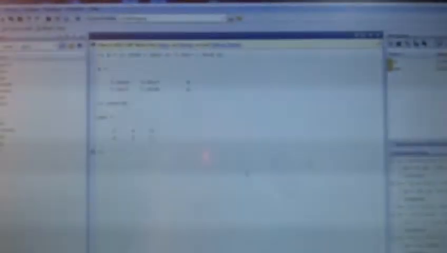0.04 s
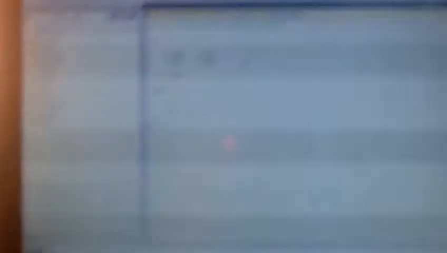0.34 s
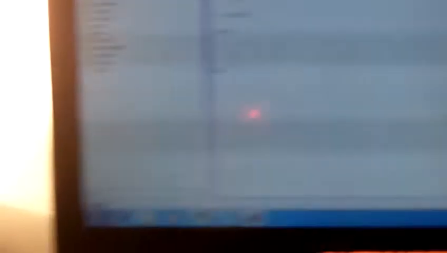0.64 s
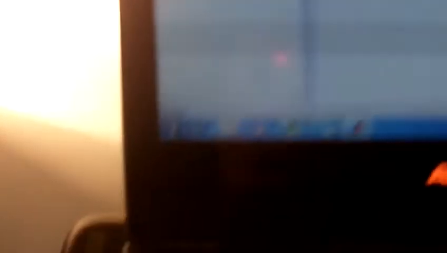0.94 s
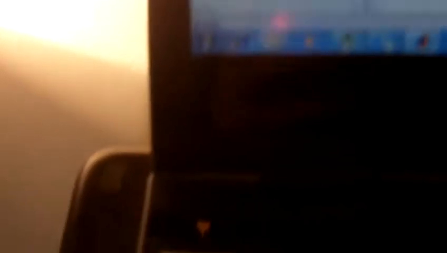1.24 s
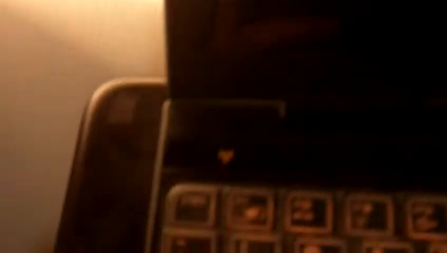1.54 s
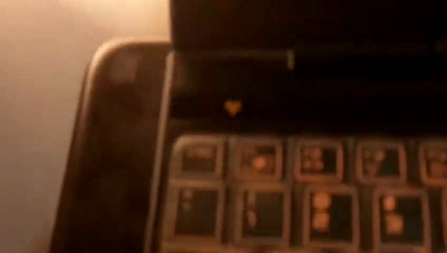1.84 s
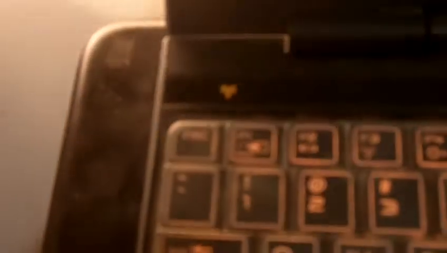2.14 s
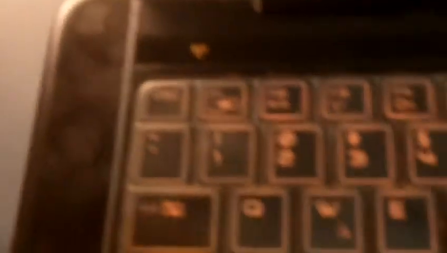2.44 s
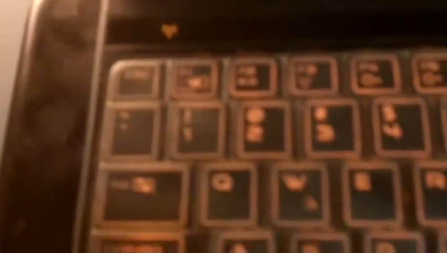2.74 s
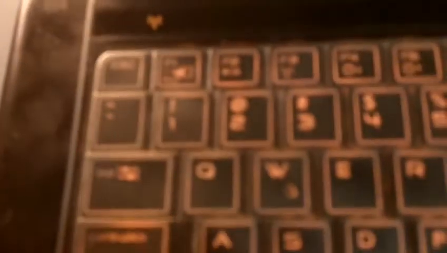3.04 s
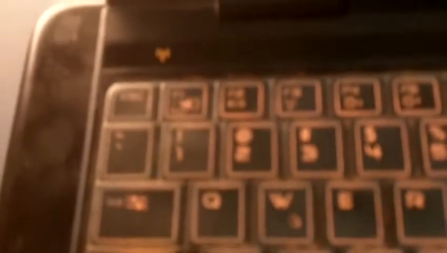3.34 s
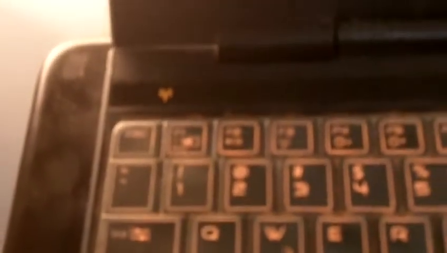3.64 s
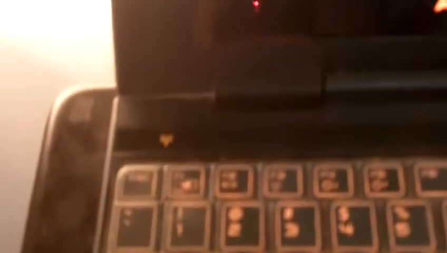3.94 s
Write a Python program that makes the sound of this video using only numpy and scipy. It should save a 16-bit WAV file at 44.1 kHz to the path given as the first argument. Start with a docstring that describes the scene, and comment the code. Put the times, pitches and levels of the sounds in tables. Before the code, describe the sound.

A laptop fan runs without a break, buzzing and blowing air in a quiet room. As the microphone drifts down to the keyboard, a low hum and soft vent hiss come forward, along with faint plastic ticks and swishes.

```python
"""Laptop fan in a quiet room

A cooling fan runs steadily while the microphone moves from the screen down to the keyboard.
The motor's chopped drive pulses, scaled by the turning magnets, ring the case: a buzz of close,
beating lines. Air rushes through the vent, soft swishes and ticks come and go, over a low rumble."""
import sys
import numpy as np
from scipy import signal
from scipy.fft import rfft, irfft
from scipy.io import wavfile
from scipy.ndimage import uniform_filter1d

SR = 44100
rng = np.random.default_rng(int(sys.argv[2]) if len(sys.argv) > 2 else 0)


def file_out(sig):
    """Save sig as 16-bit WAV at sys.argv[1]."""
    # one column per channel
    cols = np.atleast_2d(sig).T
    # limit, then scale
    lim = np.clip(cols, -1, 1)
    pcm = np.round(lim * 32767).astype(np.int16)
    wavfile.write(sys.argv[1], SR, pcm)


N = 176400
T = np.arange(N) / SR


def amp(db):
    return 10 ** (np.asarray(db) / 20)


def unit(x):
    return x / np.sqrt(np.mean(x ** 2) + 1e-30)


def curve(points):
    return np.interp(T, *np.transpose(points))


def gains(points, size):
    """Gain of a (Hz, dB) table at the bins of an FFT."""
    hz, db = np.transpose(points)
    return amp(np.interp(np.log(np.fft.rfftfreq(size, 1 / SR) + 1), np.log(hz + 1), db))


def colour(x, points):
    return irfft(rfft(x) * gains(points, N), N)


def ring(x, points, size=8192):
    """Minimum-phase filter: the table's peaks ring on after each pulse."""
    log_gain = np.log(gains(points, size))
    mirrored = np.concatenate([log_gain, log_gain[-2:0:-1]])
    response = np.fft.ifft(np.exp(np.conj(signal.hilbert(mirrored)))).real
    return signal.oaconvolve(x, response[:size // 2])[:N]


def noise(points, correlation=1):
    """Coloured stereo noise at unit RMS."""
    mid, side = rng.standard_normal((2, N))
    side *= np.sqrt((1 - correlation) / (1 + correlation))
    return unit(colour(np.array([mid + side, mid - side]), points))


# Each row: time in seconds, magnet cycle rate in Hz.
MAGNET_RATE_HZ = [(0, 128.45), (2, 127.91), (4, 127.15)]


def magnet_angle():
    """Phase of the magnet cycle in radians; the motor's speed sags slowly."""
    return 2 * np.pi * np.cumsum(curve(MAGNET_RATE_HZ)) / SR


def drive_pulses(chop_hz=189.18, echo_s=0.000689, echo_gain=0.37):
    """Chopped motor drive; each pulse returns once inside the case."""
    jitter_s = 2e-6 * unit(uniform_filter1d(rng.standard_normal(N), size=400))
    phasor = np.exp(2j * np.pi * chop_hz * (T + jitter_s))
    harmonics = 1 + echo_gain * np.exp(-2j * np.pi * chop_hz * echo_s * np.arange(25))
    return np.polyval(harmonics[::-1], phasor).real


# Magnet pull over one cycle. Each entry: relative level in dB of harmonic 0, 1, 2, 3.
PULL_HARMONICS_DB = [3.5, 20.5, -18.5, 5]
# Case response at the keyboard. Each row: frequency in Hz, relative gain in dB.
CASE_RESPONSE = [(100, -37), (300, -23.5), (440, 4.5), (520, -27.5), (700, -17.5), (818, 0.5), (900, -29.5),
                 (1080, -17), (1196, 0.5), (1265, 0.5), (1385, 2), (1452, 6), (1520, 2), (1641, 2),
                 (1770, -30), (2020, -42), (2210, -9.5), (2400, -14), (2520, -1.5), (2600, -3.5),
                 (2776, -3.5), (2850, -25.5), (2966, 2), (3090, -47.5), (3344, 1.5), (3466, -40),
                 (3533, -2), (3722, -11.5), (3900, -7.5), (4034, -3.5), (4130, -32.5), (4223, -2),
                 (4450, -29), (5000, 2), (5500, -37.5)]


def buzz(pulses, angle, level_db=-51, skew_rad=0.39):
    """Drive pulses, each as strong as the magnets' lopsided pull at that moment, ring the case."""
    swing = sum(amp(db) * np.cos(m * angle + skew_rad * m * m)
                for m, db in enumerate(PULL_HARMONICS_DB) if m)
    pull = amp(PULL_HARMONICS_DB[0]) / 2 + swing
    return amp(level_db) * unit(ring(pulses * pull, CASE_RESPONSE))


def scatter(x, decay_s=0.003, size=2048):
    """Dense reflections inside the case smear each pulse without changing its colour."""
    tail = rfft(rng.standard_normal(size) * np.exp(-np.arange(size) / (decay_s * SR)))
    allpass = irfft(tail / abs(tail))[:size // 2]
    return signal.oaconvolve(x, allpass)[:N]


# Colour of the fine buzz. Each row: frequency in Hz, relative gain in dB.
CHATTER_RESPONSE = [(300, -22), (640, -8.5), (950, -12.5), (1150, -10.5), (1350, -4), (1520, 10.5),
                    (1700, -8.5), (1900, -15), (2200, -7), (2450, 1), (2650, -3), (2900, 4), (3150, 0.5),
                    (3330, 4.5), (3650, 2), (3850, -2), (4050, 5), (4280, 2.5), (4550, -13.5),
                    (4800, -16.5), (5200, -31)]


def chatter(pulses, angle, level_db=-53.5):
    """The sharp corners of the pull add a dense comb of weaker lines."""
    corners = sum(scatter(pulses * np.cos(m * angle)) / m for m in range(4, 10))
    return amp(level_db) * unit(ring(corners, CHATTER_RESPONSE))


# Each row: frequency in Hz, relative density in dB.
AIR_SPECTRUM = [(150, 3.5), (300, 0.5), (550, -8), (800, 1), (1100, -1), (1400, 2), (1650, 4), (1900, -3),
                (2200, -11), (2500, -10.5), (2900, 7), (3400, -3.5), (3800, -7.5), (4200, -7), (4600, -7),
                (5000, -32), (6000, -27.5), (9000, -29)]


def air_rush(level_db=-57):
    """Steady rush of air, as heard at the keyboard."""
    return amp(level_db) * noise(AIR_SPECTRUM)


# Each row: time in seconds, position (0 screen, 1 keyboard, above 1 extrapolated).
MIC_PATH = [(0, 0), (.45, .05), (.9, 0.56), (1.35, 1.15), (2.2, 1.27), (4, 1.04)]
# Change of colour at the screen. Each row: frequency in Hz, gain in dB.
SCREEN_RESPONSE = [(450, -1), (1200, -0.5), (1420, -6), (1650, 4), (2000, -4), (2550, 0), (2900, -7),
                   (3250, -8.5), (3550, -4), (3950, -3), (4300, -2.5)]


def moving_microphone(fan):
    """The fan's colour shifts as the microphone moves from screen to keyboard."""
    position = curve(MIC_PATH)
    return position * fan + (1 - position) * colour(fan, SCREEN_RESPONSE)


# Each row: time in seconds, RMS level of the fundamental in dB.
HUM_LEVEL_DB = [(0, -75), (1, -59.5), (2.2, -57), (4, -58.5)]


def motor_hum(angle, third_db=-71):
    """The magnets' own hum and its third harmonic."""
    fundamental = amp(curve(HUM_LEVEL_DB)) * np.sin(angle)
    return np.sqrt(2) * (fundamental + amp(third_db) * np.cos(3 * angle))


# Each row: frequency in Hz, relative density in dB.
VENT_SPECTRUM = [(3000, -74), (4700, 9), (5500, -14), (6100, 4), (6600, 6.5), (7300, 7), (7700, -4),
                 (9000, -18), (14000, -26)]
# Each row: time in seconds, level in dB.
VENT_LEVEL_DB = [(0, -77.5), (.7, -70.5), (1.0, -66), (1.25, -66.5), (1.5, -65), (1.75, -69), (2.05, -67.5),
                 (2.25, -71.5), (2.9, -71.5), (3.4, -72.5), (4, -73)]


def vent_hiss(angle, depth=0.43):
    """Air in the vent hisses, pulsing twice per magnet cycle."""
    pulsing = unit(1 + depth * np.cos(2 * angle))
    return amp(curve(VENT_LEVEL_DB)) * pulsing * noise(VENT_SPECTRUM)


# Each row: centre in seconds, length in seconds, level in dB.
TREBLE_SWISHES = [(.44, 0.12, -77), (1.02, 0.4, -80), (1.505, 0.17, -74), (2.013, .25, -76.5),
                  (2.51, 0.24, -78), (2.918, 0.3, -74.5), (3.79, 0.11, -74.5)]
# Each row: frequency in Hz, relative density in dB.
SWISH_SPECTRUM = [(4000, -33), (6500, -8), (8200, 13), (9500, 7), (12000, 2.5), (15000, -25)]


def swishes(floor_db=-81.5):
    """Soft, bright swishes swell out of a thin, steady treble noise."""
    swell_power = sum(amp(db) ** 2 * np.exp(-(2 * (T - centre_s) / length_s) ** 2)
                      for centre_s, length_s, db in TREBLE_SWISHES)
    return np.sqrt(amp(floor_db) ** 2 + swell_power) * noise(SWISH_SPECTRUM, correlation=0.83)


# Each row: start in seconds, relative level in dB.
PLASTIC_TICKS = [(.448, -48.5), (.961, -41), (1.057, -46), (1.425, -52), (1.970, -53)]
# Each row: frequency in Hz, relative density in dB.
TICK_SPECTRUM = [(1500, -44), (4500, -9), (6500, 9.5), (8500, -5.5), (11000, -17), (15000, -43)]


def ticks(decay_s=0.0035, rattle_per_s=50):
    """A few clear ticks of plastic and a faint random rattle, each a short burst of noise."""
    rattling = rng.random(N) < rattle_per_s / SR
    rattle_db = -63 + 1.5 * np.clip(rng.standard_normal(N), -2, 2)
    hits = rattling * amp(rattle_db)
    for start_s, db in PLASTIC_TICKS:
        hits[round(start_s * SR)] += amp(db)
    envelope = signal.lfilter([1], [1, -np.exp(-1 / (decay_s * SR))], hits)
    return envelope * noise(TICK_SPECTRUM) / 2


# Each row: frequency in Hz, RMS level in dB at the start, then at the end.
WHINE_TONES = [(8000, -104, -81), (10939, -95, -95)]


def whine():
    """Faint high tones from the electronics."""
    return np.sqrt(2) * sum(amp(np.linspace(start_db, end_db, N)) * np.sin(2 * np.pi * hz * T)
                            for hz, start_db, end_db in WHINE_TONES)


# Each row: frequency in Hz, relative density in dB.
RUMBLE_SPECTRUM = [(2, -24), (12, 3), (22, 2.5), (32, -2.5), (48, 0), (64, -6.5), (80, -8.5), (100, -13),
                   (150, -20.5), (220, -27.5), (300, -38.5), (600, -39.5), (2000, -72.5)]
# Each row: time in seconds, level in dB.
RUMBLE_LEVEL_DB = [(0, -43.5), (.9, -42), (1.4, -42.5), (2.4, -41.5), (3.1, -42.5), (3.38, -41),
                   (3.6, -43.5), (4, -43)]


def rumble():
    """Low noise, wavering slightly in level."""
    return amp(curve(RUMBLE_LEVEL_DB)) * noise(RUMBLE_SPECTRUM, correlation=0.98)


def scene():
    angle = magnet_angle()
    pulses = drive_pulses()
    fan = buzz(pulses, angle) + chatter(pulses, angle) + air_rush()
    background = whine() + rumble()
    return moving_microphone(fan) + motor_hum(angle) + vent_hiss(angle) + swishes() + ticks() + background


# Each row: frequency in Hz, relative density in dB.
SELF_NOISE_SPECTRUM = [(100, -28), (5500, -20), (8000, -1.5), (11000, 5), (15000, -3.5)]
SELF_NOISE_DB = -79
NOTCH_HZ, NOTCH_WIDTH_HZ, CUTOFF_HZ = 5426, 310, 15100


def record(dry):
    """The microphone's self-noise, its notch, then the band limit."""
    self_noise = amp(SELF_NOISE_DB) * noise(SELF_NOISE_SPECTRUM, correlation=0.38)
    b, a = signal.iirnotch(NOTCH_HZ, NOTCH_HZ / NOTCH_WIDTH_HZ, SR)
    notched = signal.lfilter(b, a, dry + self_noise)
    lowpass = signal.firwin(511, CUTOFF_HZ, window=("kaiser", 9), fs=SR)
    return signal.oaconvolve(notched, lowpass[None], "same")


dry = scene()
out = record(dry)
file_out(out)
```